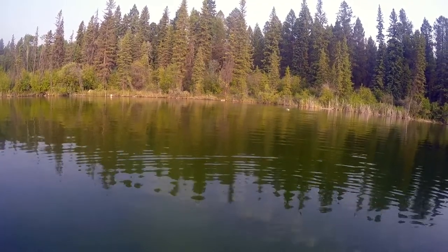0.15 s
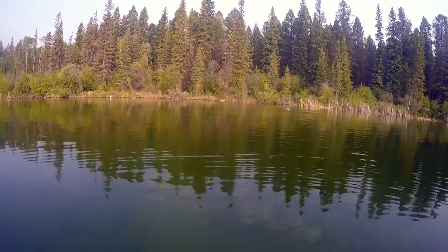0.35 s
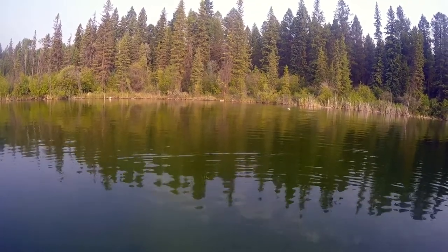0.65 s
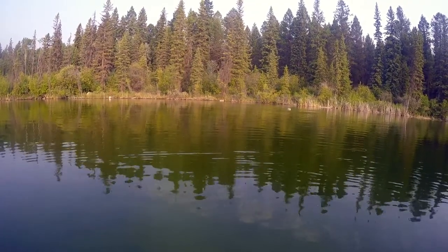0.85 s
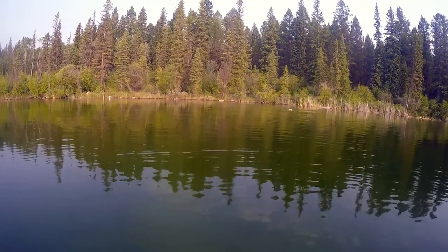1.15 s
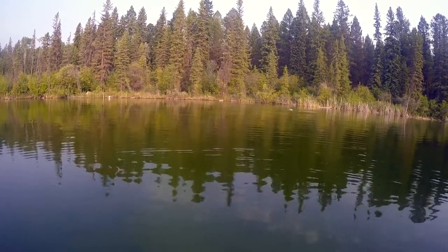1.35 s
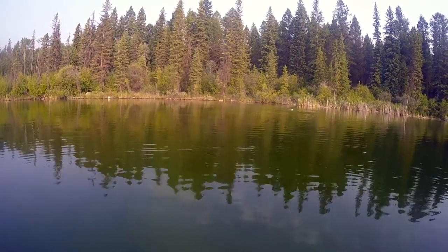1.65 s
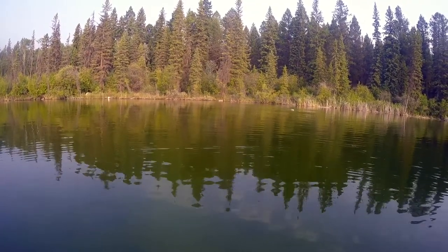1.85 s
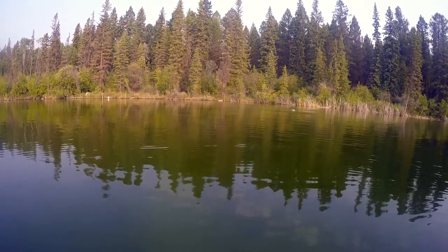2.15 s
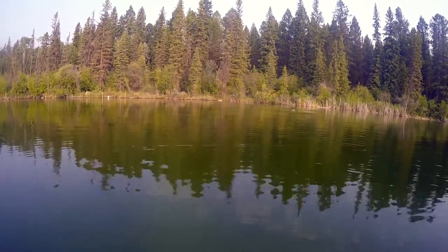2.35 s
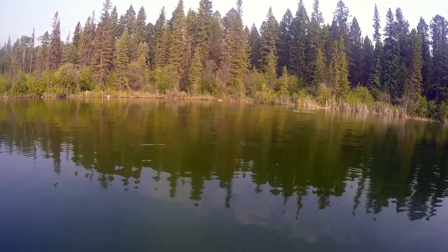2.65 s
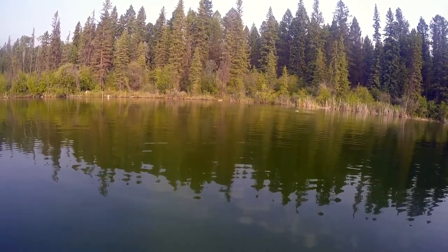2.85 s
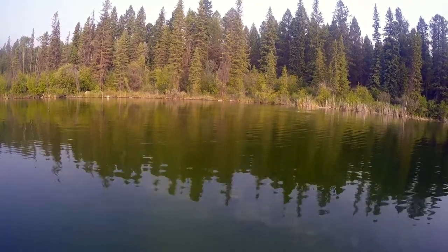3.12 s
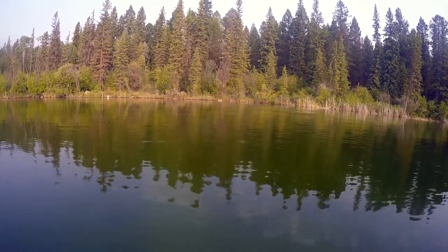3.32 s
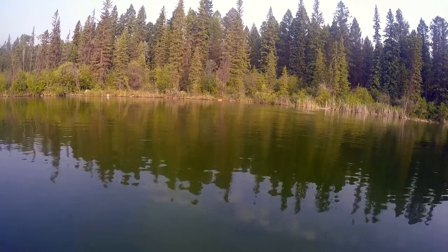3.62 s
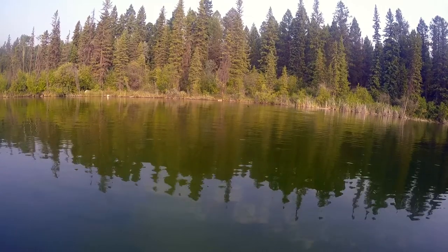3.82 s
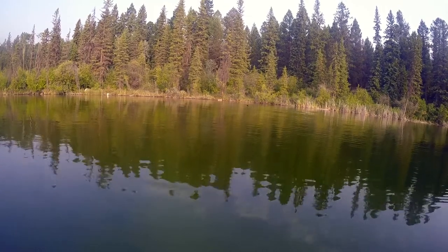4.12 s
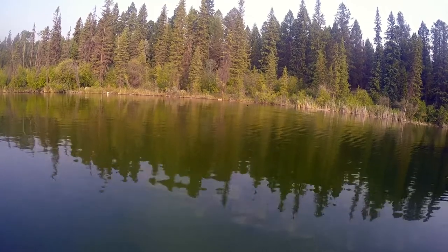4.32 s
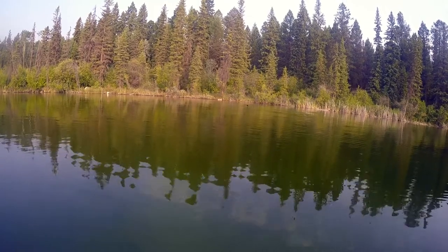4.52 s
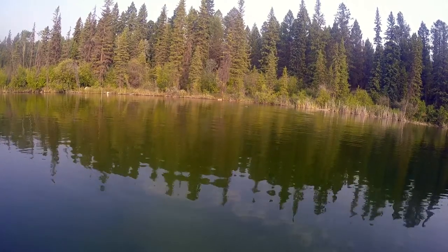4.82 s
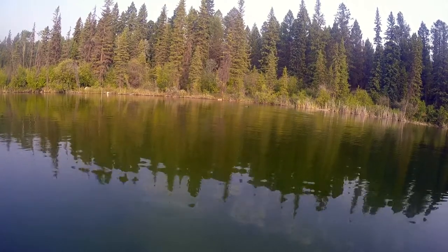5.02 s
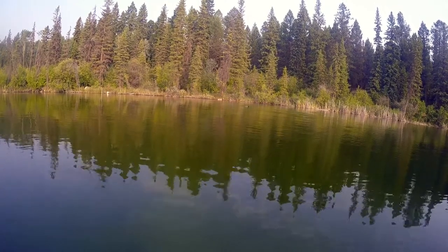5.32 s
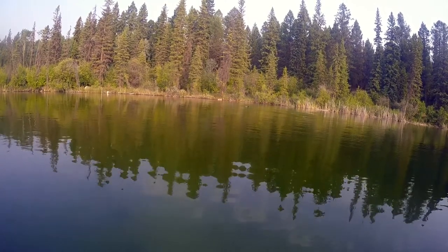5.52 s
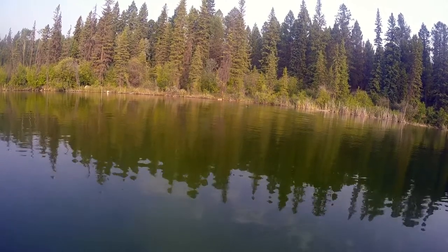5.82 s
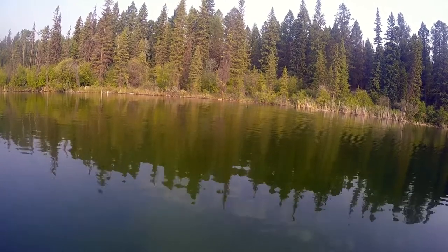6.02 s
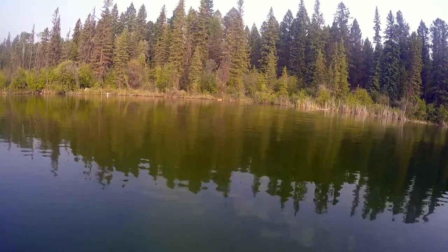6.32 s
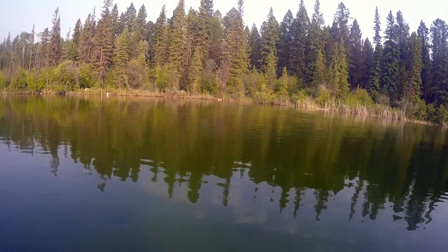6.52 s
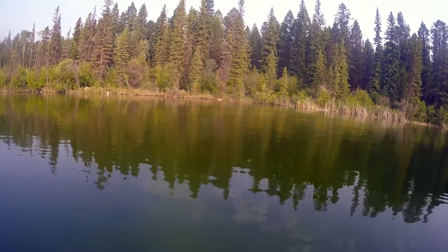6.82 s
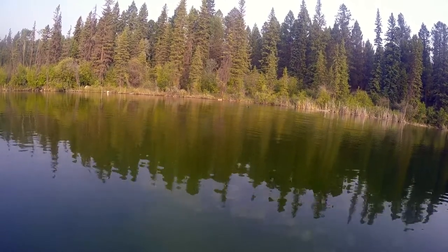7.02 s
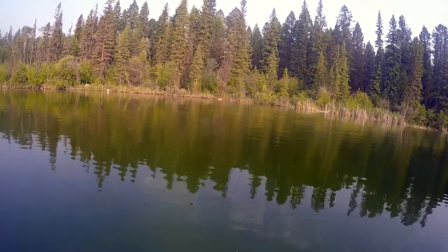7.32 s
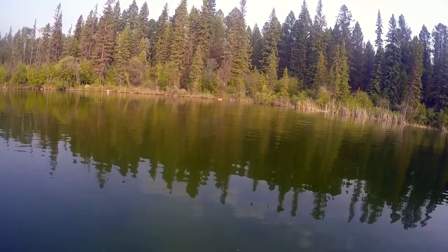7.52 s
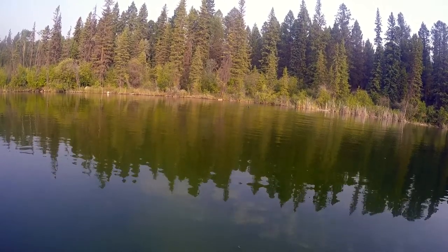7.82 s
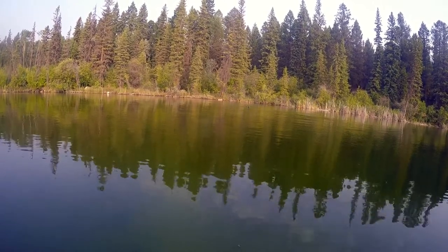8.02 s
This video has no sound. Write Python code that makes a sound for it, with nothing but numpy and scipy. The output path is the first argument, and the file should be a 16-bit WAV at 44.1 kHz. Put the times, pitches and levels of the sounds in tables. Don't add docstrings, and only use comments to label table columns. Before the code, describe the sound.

Two loons trade quavering, laughing tremolo calls across an echoing forest lake while small wavelets plop and tap against a hollow boat hull.

```python
import sys
import numpy as np
from scipy import signal
from scipy.io import wavfile
from scipy.ndimage import uniform_filter1d

SR = 44100
rng = np.random.default_rng(int(sys.argv[2]) if len(sys.argv) > 2 else 0)


def boost(x):
    u = np.asarray(x, float) / 20
    return 10 ** u


def dump_mix(stems):
    frames = np.atleast_2d(stems).T
    limited = np.clip(frames, -1, 1)
    pcm = np.round(limited * 32767).astype(np.int16)
    wavfile.write(sys.argv[1], SR, pcm)


N = 359856


def evened(x):
    return x / np.sqrt(np.mean(x ** 2) + 1e-20)


def add(mix, start_s, sound):
    part = mix[round(start_s * SR):][:len(sound)]
    part += sound[:len(part)]


def wander(count, span):
    noise = uniform_filter1d(rng.standard_normal(count), span)
    return evened(uniform_filter1d(noise, span))


# frequency_hz, density_db (dB per Hz)
AIR_SPECTRUM = [(12, -42), (20, 6.5), (106, -12), (190, -14), (243, -16), (424, -20), (718, -18),
                (922, -21.5), (1150, -21), (1360, -24.5), (1700, -24), (5020, -28), (5450, -30),
                (8740, -35), (15200, -39)]


def air():
    frames, hz = N // 512 + 5, np.fft.rfftfreq(2048, 1 / SR)
    real, imaginary, patches = rng.standard_normal((frames, 1025, 3)).T
    patches = evened(uniform_filter1d(uniform_filter1d(patches, 14, 0), 8, 1))
    curve_hz, curve_db = np.transpose(AIR_SPECTRUM)
    density_db = np.interp(np.log(hz + 1), np.log(curve_hz + 1), curve_db)
    spectra = (real + 1j * imaginary) * boost(density_db[:, None] + .7 * patches)
    noise = signal.istft(spectra, nperseg=2048, noverlap=1536)[1][:N]
    return boost(-58) * evened(noise)


def camera_ticks(hz=8550, db=-73, width_s=0.0016, first_s=0.056):
    t = np.arange(N) / SR
    frame_s = 1001 / 30000
    since = (t - first_s) % frame_s - frame_s / 2
    return boost(db) * np.exp(-.5 * (since / width_s) ** 2) * np.sin(2 * np.pi * hz * since)


# centre_s, level_db, length_s
HULL_BOOMS = [(0.301, -72.5, 0.54), (1.95, -65.5, 0.21), (2.865, -60, 0.13), (3.296, -57, 0.19),
              (4.049, -69, 0.26), (4.95, -65.5, 0.27), (5.388, -60, 0.156), (5.808, -68.5, .25),
              (7.331, -59.5, 0.25), (7.728, -55.5, .2)]


def hull_hum(low_hz=88, high_hz=110, rest_db=-69):
    t = np.arange(N) / SR
    lift = boost(rest_db)
    for s, db, length in HULL_BOOMS:
        lift = lift + boost(db) * np.exp(-(2 * (t - s) / length) ** 4)
    band = signal.butter(2, [low_hz, high_hz], "band", fs=SR, output="sos")
    return lift * evened(signal.sosfilt(band, rng.standard_normal(N)))


# start_s, peak_db
LAP_TICKS = [(0.1271, -56), (0.1531, -57), (0.1705, -57), (0.188, -54), (0.2089, -53), (0.3491, -53),
             (0.5277, -54), (1.2854, -52), (1.3374, -49), (1.696, -52), (2.3455, -54), (3.5164, -51),
             (4.228, -53), (4.2497, -46), (4.385, -53), (5.1203, -55), (5.3787, -53), (5.4969, -50),
             (5.5897, -54), (5.6695, -51), (5.8147, -52), (5.9154, -54), (6.5994, -60), (7.1492, -49),
             (7.2833, -48), (7.8885, -48), (8.088, -51)]


def lap_ticks(per_s=9, db=-63, spread_db=3.5, low_hz=1300, high_hz=5600):
    sizes = boost(db + spread_db * np.minimum(rng.exponential(1, N), 3))
    hits = (rng.random(N) < per_s / SR) * sizes
    fade = np.exp(-np.arange(200) / 70.)
    out = np.zeros(N)
    for s, peak_db in LAP_TICKS:
        add(out, s, boost(peak_db + 3) * fade * rng.standard_normal(200))
    faint = signal.oaconvolve(hits, fade * rng.standard_normal(200))[:N]
    band = signal.butter(3, [low_hz, high_hz], "band", fs=SR, output="sos")
    return signal.sosfilt(band, out + faint)


# frequency_hz, level_db, t60_s
HULL_MODES = [(601, 2.5, 0.016), (900, 9.5, 0.011), (1303, 8, 0.011), (1600, 2, .01), (1950, 5, 0.018),
              (2740, -1, 0.01), (4200, -9, 0.01), (5800, -24, 0.021)]


def slap(mix):
    t = np.arange(1000) / SR
    rings = 0
    for (hz, db, t60), (share, detune) in zip(HULL_MODES, mix):
        decay = boost(db + 2.5 * share - 60 * t / t60)
        rings = rings + decay * np.sin(2 * np.pi * hz * (1 + .07 * detune) * t + 3 * share)
    return (1 - np.exp(-t / .0008)) ** 2 * rings


def plop(db, hz, t60, slap_db):
    t = np.arange(round(1.5 * t60 * SR)) / SR
    wobble = np.clip((-28 - db) / 30, .05, .6)
    pitch = hz * (1.005 - 0.04 * np.exp(-t / 0.0016) + .07 * wobble * wander(len(t), 30))
    swell = (1 - np.exp(-t / 0.0036)) ** 1.3 * boost(-60 * (t / (.8 * t60)) ** 1.4)
    strength = swell / swell.max() * (1 + .6 * wobble * wander(len(t), 24))
    sound = boost(slap_db + .4 * wobble) * slap(rng.standard_normal((len(HULL_MODES), 2)))
    sound = np.r_[sound, np.zeros(len(t))]
    add(sound, 0, strength * np.sin(2 * np.pi * np.cumsum(pitch) / SR))
    return boost(db) * sound


# start_s, length_s, level_db
DRAININGS = [
    (6.02, .14, -57),
    (7.3, .12, -60),
    (7.62, .11, -52),
    (7.75, .13, -55),
    (8.0, .12, -58),
]


def gurgles(count=14, low_hz=520, octaves=1.5, spread_db=3.0):
    out = np.zeros(N)
    for s, length, db in DRAININGS:
        for when, size, softness in rng.random((count, 3)):
            bubble = plop(db - 2 * spread_db * softness, low_hz * 2 ** (octaves * size), .03, -14)
            add(out, s + when * length, bubble)
    return out


def scatter(x, start_s, swell_s, t60, cut_hz):
    t = np.arange(round(1.1 * t60 * SR)) / SR
    tail = rng.standard_normal(len(t)) * (1 - np.exp(-t / swell_s)) * boost(-60 * t / t60)
    tail = signal.lfilter(*signal.butter(2, cut_hz, fs=SR), tail)
    tail = np.r_[np.zeros(round(start_s * SR)), tail / np.linalg.norm(tail)]
    return signal.fftconvolve(x, tail)[:N]


# start_s, peak_db, bubble_hz, t60_s, slap_db (beside the bubble)
STRONG_PLOPS = [(0.052, -39, 2820, 0.0089, -11), (0.076, -39, 1910, 0.025, -30),
                (0.371, -31.5, 1297, 0.034, -21), (1.061, -36, 2117, 0.014, -11),
                (1.776, -36.5, 1674, 0.017, -8), (2.021, -24, 1138, 0.029, -27),
                (2.111, -40, 1950, 0.022, -8.5), (2.478, -40, 2010, 0.012, -4),
                (2.957, -41.5, 1645, 0.024, -10), (3.658, -34, 1970, 0.023, -15),
                (3.791, -28, 1902, 0.026, -17.5), (3.933, -33, 2024, 0.016, -8.5),
                (4.025, -39.5, 1295, 0.024, -33), (4.083, -41, 1756, 0.033, -6),
                (4.433, -31, 1986, 0.018, -12), (4.763, -41, 2085, 0.017, -6), (5.711, -47, 1080, .03, -30),
                (5.967, -34, 824, 0.046, -20), (6.192, -36, 1121, 0.04, -15),
                (6.537, -26.5, 1303, 0.012, -22.5), (6.781, -37, 1329, 0.045, -10),
                (7.224, -24.5, 1940, 0.024, -18), (7.522, -30.5, 1940, 0.018, -11),
                (7.668, -39.5, 2950, 0.012, -4.5), (7.78, -31.5, 1920, 0.021, -12)]
# bubble_hz, t60_s, slap_db
AIR_POCKETS = [
    (1307, 0.02, -3.5),
    (1618, 0.016, -6.5),
    (1970, 0.017, -6.5),
    (2900, .012, -5),
]
# start_s, peak_db
LAPS_WIDE = [(0.489, -55), (5.888, -52), (6.323, -51.5), (6.395, -48.5), (6.499, -54), (6.832, -51),
             (6.86, -51), (7.148, -49), (8.026, -58)]
LAPS_MIDDLE = [(0.349, -53), (0.995, -45), (2.396, -50), (2.627, -42.5), (4.684, -47), (5.081, -53),
               (5.513, -49.5), (5.73, -48.5), (6.466, -47.5), (8.041, -51.5)]
LAPS_NARROW = [(0.861, -46), (1.265, -41.5), (1.396, -44), (2.243, -51), (4.971, -50), (5.379, -51.5),
               (5.442, -50.5), (5.915, -51), (7.056, -47), (7.101, -50), (7.178, -53), (7.268, -54),
               (7.283, -45.5), (7.862, -50), (7.89, -46), (8.13, -47)]
LAPS_TIGHT = [
    (3.227, -56),
    (3.372, -52),
    (5.226, -52.5),
]
# start_s, peak_db, bubble_hz
LOW_GULPS = [(0.153, -44.5, 765), (1.116, -46, 1155), (2.022, -43, 540), (4.272, -49, 520),
             (5.496, -48.5, 1093), (5.59, -52, 630), (5.669, -56, 720), (5.804, -50, 593),
             (6.133, -51.5, 833), (6.172, -48.5, 760), (7.621, -61, 980), (7.638, -52, 770),
             (8.075, -52.5, 790)]
BRIGHT_BUBBLES = [(3.677, -47, 3950), (4.084, -49, 3600), (6.325, -56.5, 3960), (6.396, -54, 4200),
                  (6.86, -50.5, 4200), (6.891, -55, 4840), (7.283, -56.5, 6500), (7.889, -53.5, 4600),
                  (8.116, -49.5, 3930)]
EARLY_DRIPS = [(.085, -54, 4000), (.188, -55, 4600), (.298, -56, 2500), (.657, -57, 3000),
               (.753, -48, 2950), (.843, -53, 2100), (.886, -54, 2500), (.94, -55, 2250),
               (1.108, -46, 2560), (1.179, -49, 1200), (1.42, -50, 2600), (2.695, -47, 2550),
               (2.715, -48, 2520), (3.63, -44, 2700), (4.193, -53, 2850), (4.306, -54, 2700),
               (4.385, -53, 3900), (4.386, -50, 1900), (1.239, -48, 1970), (1.275, -50, 2900),
               (1.285, -51, 2000), (1.323, -51, 1950), (1.341, -48, 1720), (1.464, -54, 2400),
               (1.566, -54, 2400), (1.573, -53, 1900), (1.664, -54, 2400), (1.733, -55, 4400),
               (1.884, -53, 2700), (1.965, -38, 1300), (2.065, -52, 2450), (2.244, -52, 2800),
               (2.294, -52, 1950), (2.3, -54, 2700), (2.478, -50, 3900), (2.579, -56, 1700),
               (2.643, -50, 2700), (2.654, -50, 2050), (2.707, -52, 2000), (2.749, -52, 2750),
               (2.984, -55, 3900), (3.024, -54, 2500), (3.036, -53, 1800), (3.311, -43, 900),
               (3.517, -50, 2000), (3.552, -52, 1900), (3.565, -50, 1900), (3.604, -54, 1900),
               (3.705, -53, 2800), (3.714, -52, 1950), (4.686, -46, 1900), (4.764, -50, 3000),
               (4.973, -50, 4000), (5.12, -57, 2800), (5.146, -55, 2800)]
LATER_DRIPS = [(4.944, -55, 2000), (5.324, -58, 2950), (5.39, -55, 1900), (5.459, -57, 1500),
               (5.497, -53, 2000), (5.59, -55, 2000), (5.67, -54, 4500), (5.671, -56, 2000),
               (5.756, -57, 2100), (5.816, -57, 3700), (5.911, -56, 2700), (5.982, -54, 2050),
               (6.224, -54, 1800), (6.301, -54, 1950), (6.391, -54, 1750), (6.5, -54, 2850),
               (6.538, -54, 2650), (6.63, -56, 1950)]
BOW_RUN = [(6.424, -43, 2900), (6.425, -45, 1980), (6.445, -45.5, 2850), (6.445, -52, 1900),
           (6.474, -45, 3080), (6.476, -51, 1950), (6.575, -60, 2050), (6.625, -56, 2000),
           (6.651, -59, 2900), (6.765, -56, 1750), (6.783, -50, 2050), (6.804, -61, 4800),
           (6.86, -52, 1950), (6.893, -49, 2600), (6.918, -46, 2850), (6.94, -55, 2100), (6.94, -56, 1300),
           (7.149, -54, 2000), (7.318, -53, 2050), (7.34, -60, 3600), (7.347, -52, 2000),
           (7.416, -56, 2800), (7.734, -54, 1950), (7.788, -44, 2720), (7.788, -42, 1750),
           (7.842, -54, 1350), (7.888, -51, 1150)]
# frequency_hz, level_db, t60_s
BOAT_CAVITY = [(1308, -49, 0.052), (1848, -50, 0.079), (801, -53, 0.13)]


def lapping(per_s=100, small_db=-71, spread_db=4.5):
    out = np.zeros(N)
    for s, *drop in STRONG_PLOPS:
        add(out, s, plop(*drop))
    for laps, (hz, *ring) in zip((LAPS_WIDE, LAPS_MIDDLE, LAPS_NARROW, LAPS_TIGHT), AIR_POCKETS):
        for s, db in laps:
            add(out, s, plop(db, hz * rng.uniform(.98, 1.02), *ring))
    # events, t60_s, slap_db
    for rows, t60, slap_db in ((LOW_GULPS, .023, -4), (BRIGHT_BUBBLES, .009, -6.5), (EARLY_DRIPS, .012, -9),
                               (LATER_DRIPS, .012, -9), (BOW_RUN, .012, -6)):
        for s, db, hz in rows:
            add(out, s, plop(db, hz, t60, slap_db))
    busy = boost(5 * wander(N, 4000))
    for _ in range(8):
        sizes = boost(small_db + spread_db * np.minimum(rng.exponential(1, N), 3))
        hits = sizes * (rng.random(N) < busy * per_s / 8 / SR)
        out += signal.oaconvolve(hits, slap(rng.standard_normal((len(HULL_MODES), 2))))[:N]
    t = np.arange(6000) / SR
    cavity = sum(boost(db - 60 * t / t60) * np.sin(2 * np.pi * hz * t) for hz, db, t60 in BOAT_CAVITY)
    splash = boost(-24.5) * scatter(out, start_s=.006, swell_s=.002, t60=0.056, cut_hz=4600)
    water = out + signal.oaconvolve(out, cavity)[:N] + splash
    return signal.sosfilt(signal.butter(3, 430, "high", fs=SR, output="sos"), water)


def arched(t, s, values, bend):
    if bend is None:
        return np.interp(t, s, values)
    low_rise, low_fall, top_rise, top_fall = (*bend, 2.05, 2.6)[:4]
    k = np.clip(np.searchsorted(s, t) - 1, 0, len(s) - 2)
    a, b = values[k], values[k + 1]
    u = np.clip((t - s[k]) / (s[k + 1] - s[k]), 0, 1)
    rising = b > a
    from_low = np.where(rising, u, 1 - u)
    arch = 1 - (1 - from_low) ** np.where(rising, top_rise, top_fall)
    return np.minimum(a, b) + abs(b - a) * arch ** np.where(rising, low_rise, low_fall)


def phrase(points, onset, voices, bend, level_bend, top_hz, flutter, flutter_s=.3, strain=0,
           throat=(1, 1, 0), crack=0, muffled_db=-2.3, odd_db=0):
    s, turn_hz, turn_db = np.transpose(points)
    t = np.arange(onset, s[-1], 1 / SR)
    since = t - onset
    arch_hz = arched(t, s, turn_hz, bend)
    hz = arch_hz * (1 + .002 * wander(len(t), 90))
    level = arched(t, s, boost(turn_db), level_bend) * boost(0.56 * wander(len(t), 120))
    climb_rate = np.gradient(arch_hz) * SR
    climbing = np.clip(climb_rate / 4000, 0, 1) * np.exp(-since / flutter_s)
    shiver = np.sin(2 * np.pi * np.cumsum(235 * (1 + 0.058 * wander(len(t), 150))) / SR)
    turns = 2 * np.pi * np.cumsum(hz) / SR + flutter * climbing * shiver
    turns += crack * np.exp(-(since / .014) ** 2) * wander(len(t), 50)
    throat_hz, width_hz, throat_db = throat
    throat_db = throat_db * uniform_filter1d(np.clip(.4 + climb_rate / 1500, 0, 1), 200)
    octaves = np.log2(arch_hz / top_hz)
    uneven_db = [2.0 * (k > 1) * wander(len(t), 1500) for k in range(8)]
    strain_db = strain * np.clip(turn_db.max() + 36, -1.5, 1)
    soft_db = .1 * (20 * np.log10(level) - turn_db.max() + 2)
    opening = np.exp(-since / .06)

    def register(overtones, pinch):
        tone = 0
        for k, db, slope in overtones:
            k = round(k)
            gain_db = db + slope * octaves + strain_db * (k - 1) + soft_db * (k > 2) + uneven_db[k]
            gain_db = gain_db + muffled_db * opening * max(k - 2, 0)
            gain_db = gain_db + odd_db * opening * ((k == 3) - .3 * (k == 4))
            gain_db = gain_db + pinch * throat_db * np.exp(-((k * hz - throat_hz) / width_hz) ** 2)
            tone = tone + boost(gain_db) * np.sin(k * turns + k)
        return tone

    low, high = register(voices[0], 2), register(voices[1], 1)
    flipped = uniform_filter1d(1. * np.maximum.accumulate(arch_hz > 1165), 200)
    tone = low + flipped * (high - low)
    edges = np.clip(np.minimum(since / .008, (s[-1] - t) / .006), 0, 1)
    return onset, np.sqrt(2) * level * tone * edges


def laughs(throbs, sag):
    climb_s, ratio, dip_db, last_s, last_db, rise_s = sag
    rows = np.array(throbs)
    for breath in np.split(rows, np.flatnonzero(rows[:, 3] > 1e-3)[1:]):
        s, hz, db, lead = breath.T
        low_hz, low_db = hz[0] * ratio, db[0] + dip_db
        points = [(s[0] - max(lead[0], rise_s) - 1e-3, low_hz, low_db - 1), (s[0] - rise_s, low_hz, low_db)]
        falls = np.r_[np.diff(s) - climb_s, last_s]
        dips_db = np.r_[dip_db * np.minimum(np.diff(s) / .095, 1) ** 2, last_db]
        sag_hz = ratio * np.r_[np.maximum(hz[1:], hz[:-1]), 1.005 * hz[-1]]
        for row in zip(s, hz, db, s + falls, sag_hz, db + dips_db):
            points += [row[:3], row[3:]]
        end_s, end_hz, end_db = points[-1]
        points += [(end_s + .013, end_hz, end_db - 9)]
        yield points, s[0] - lead[0]


def glide(s, length, hz, db, swell_db, climb, curl=.5, ceiling_hz=905):
    rise = np.clip((ceiling_hz - hz) / max(climb, 1), 0, 1) if hz < ceiling_hz else 1
    rise = min(rise, length - 1e-3)
    end_db = swell_db * rise / length
    top_hz = hz + climb * rise
    points = [(s, hz, db), (s + rise / 2, hz + curl * climb * rise, db + end_db / 2),
              (s + rise, top_hz, db + end_db), (s + length, top_hz, db + swell_db)]
    return points, s


def wind_up(s, hz, sag, climb, db):
    return [(s, hz, db - 7.5), (s + sag, 860, db - 11.5), (s + sag + climb, 1097, db)], s


# multiple, level_db, slope_db (gained per octave of pitch)
MELLOW_VOICE = [(1, 1, -3), (2, -15, 18), (3, -30, 16), (4, -31.5, 39), (5, -41, 31), (6, -48, 34),
                (7, -51, 27)]
BRIGHT_VOICE = [(1, 0, 0), (2, -28, -21), (3, -17.5, 5), (4, -14, 26), (5, -33, -4), (6, -33, .1),
                (7, -47, 6)]
BRIGHT_LOW_VOICE = [(1, 0, 0), (2, -23, 12), (3, -30, .1), (4, -21, 6), (5, -25, .1), (6, -37, 9)]
SQUEEZED_VOICE = [(1, -5, .1), (2, -7, .1), (3, -24, .1), (4, -27, .1), (5, -24, .1), (6, -29, .1),
                  (7, -28, .1)]
SOFT_VOICE = [(1, -0.5, .1), (2, -33, .1)]
LAST_SQUEEZED_VOICE = [(1, -4, 0), (2, 1, 0), (3, -15, 0), (4, -32, 0)]
CLOSING_NOTE_VOICE = [(1, .1, .1), (2, -36, .1), (3, -29, -8), (4, -25, -4), (5, -38, 8)]
# top_s, top_pitch_hz, top_level_db, lead_s (voice sets in before the top; 0 runs on)
MELLOW_TOPS = [(0.054, 1171, -37.5, 0.022), (0.155, 1161, -36, .02), (0.268, 1135, -39.5, 0.012),
               (1.327, 1162, -35.5, .09), (1.427, 1171, -34.5, 0.00016), (1.527, 1178, -34.5, 0.00072),
               (1.629, 1175, -35, 0.00042), (1.733, 1159, -36.5, 0.021), (2.752, 1174, -35, 0.077),
               (2.852, 1193, -34, 0), (2.953, 1190, -35, 0), (3.056, 1188, -34.5, 0.0004),
               (3.165, 1171, -36.5, 0.023), (3.288, 1040, -41, .002), (4.191, 1173, -35, 0.099),
               (4.293, 1184, -35, 0.00032), (4.397, 1189, -36, 0), (4.503, 1189, -37, .025),
               (4.615, 1146, -36.5, .011)]
BRIGHT_TOPS = [(0.728, 1225, -39.5, .006), (0.809, 1271, -36, 0), (0.912, 1257, -37.5, 0),
               (1.018, 1199, -40.2, 0.00022), (1.984, 1279, -37.5, .009), (2.084, 1286, -38, 0.000062),
               (2.187, 1255, -39.5, 0), (2.297, 1175, -42, 0), (3.294, 1164, -40, .006),
               (3.368, 1282, -35.5, 0), (3.467, 1284, -35.5, 0.000073), (3.572, 1248, -37, 0),
               (3.682, 1183, -40, 0.00024), (4.611, 1292, -37.5, .007), (4.708, 1306, -34.9, 0),
               (4.811, 1286, -35.5, 0), (4.918, 1253, -36.5, 0.00022)]
# climb_s, pitch_ratio, dip_db (from the top), last_fall_s, last_dip_db, first_rise_s
MELLOW_DIP = (0.055, 0.785, -15.5, .046, -13, 0.052)
BRIGHT_DIP = (0.051, 0.8, -18, .064, -15, .05)
# time_s, pitch_hz, level_db
CLOSING_NOTE = [
    (4.984, 790, -58),
    (5.03, 972, -42.5),
    (5.064, 945, -52),
]
# start_s, pitch_hz, sag_s, climb_s, break_level_db
BREAK_WIND_UPS = [
    (0.632, 916, 0.034, .058, -38),
    (1.883, 997, .051, .044, -37.5),
    (4.542, 930, .016, .044, -36.5),
]
# start_s, length_s, pitch_hz, level_db, swell_db
HELD_NOTE = (3.257, .036, 1058, -39, -1)
THROB_LEAD_INS = [(0.008, 0.028, 700, -53.5, 4), (0.112, .027, 680, -54, 5), (0.226, 0.033, 660, -54, 5),
                  (1.69, .024, 670, -60, 11), (3.118, 0.028, 660, -55, 3), (4.457, .025, 690, -49.5, 2),
                  (4.576, 0.026, 668, -50, 2)]
RISING_SQUEEZES = [(1.193, .05, 705, -47, -6), (1.812, 0.047, 620, -55.5, 3), (1.862, .021, 671, -59, 13),
                   (2.628, .05, 739, -48, -6), (3.222, .034, 610, -62, 12), (3.255, .029, 700, -48.5, -4),
                   (4.06, .037, 755, -44.5, -5), (4.492, .035, 655, -51, -2)]
SLOW_SQUEEZES = [
    (0.586, 0.044, 680, -56, 5),
    (3.195, .035, 585, -56.5, -5),
]
SOFT_HOOTS = [(1.085, 0.038, 790, -59, -9), (2.362, .035, 797, -57, -1), (3.875, .024, 780, -51, -3),
              (4.635, .045, 820, -48, -7), (5.084, .032, 820, -73.5, 21), (5.32, .014, 820, -60.5, 12)]
FINAL_SQUEEZE = (5.727, .052, 805, -50, -9, -800)


def loons():
    out = np.zeros(N)
    throat, squeezed_throat = (2860, 220, 8), (1620, 230, 4.5)  # centre_hz, width_hz, gain_db
    for shape in laughs(MELLOW_TOPS, MELLOW_DIP):
        add(out, *phrase(*shape, (MELLOW_VOICE, MELLOW_VOICE), (1.9, 2.5, 2.05, 2.6), (1.8, 1.9, 2.05, 2.6),
                         top_hz=1168, flutter=0.23, flutter_s=0.34))
    for shape in laughs(BRIGHT_TOPS, BRIGHT_DIP):
        add(out, *phrase(*shape, (BRIGHT_LOW_VOICE, BRIGHT_VOICE), (1.45, 1.6, 1.7, 1.7), (3.6, 4.3, 2.6, 1.7),
                         top_hz=1310, flutter=0.5, flutter_s=0.07, strain=.45, throat=throat,
                         crack=.13, muffled_db=-.4, odd_db=-9))
    add(out, *phrase(CLOSING_NOTE, CLOSING_NOTE[0][0], (CLOSING_NOTE_VOICE, CLOSING_NOTE_VOICE),
                     (1.4, 1.1), (1.2, 1.1), top_hz=970, flutter=.05, throat=(2760, 240, 7), muffled_db=0))
    for shape in [glide(*HELD_NOTE, 630), *(wind_up(*row) for row in BREAK_WIND_UPS)]:
        add(out, *phrase(*shape, (BRIGHT_LOW_VOICE, BRIGHT_LOW_VOICE), (1.5, 1.6), (2.2, 3.2),
                         top_hz=1100, flutter=0.3, flutter_s=0.1, throat=throat))
    squeezes = [(glide(*row, 10000, .28, 960), SQUEEZED_VOICE) for row in THROB_LEAD_INS]
    squeezes += [(glide(*row, 6000), SQUEEZED_VOICE) for row in RISING_SQUEEZES]
    squeezes += [(glide(*row, 1500), SQUEEZED_VOICE) for row in SLOW_SQUEEZES]
    squeezes += [(glide(*FINAL_SQUEEZE), LAST_SQUEEZED_VOICE)]
    for shape, voice in squeezes:
        add(out, *phrase(*shape, (voice, voice), None, None, top_hz=780, flutter=0.15,
                         throat=squeezed_throat, muffled_db=0))
    for row in SOFT_HOOTS:
        add(out, *phrase(*glide(*row, 630), (SOFT_VOICE, SOFT_VOICE), (1.2, 1.2), (.8, .8),
                         top_hz=800, flutter=.1))
    return out


def shore_echoes(birds):
    near = scatter(birds, start_s=0.011, swell_s=0.03, t60=0.48, cut_hz=3000)
    thin = signal.lfilter(*signal.butter(3, 1080, "high", fs=SR), birds)
    far = scatter(thin, start_s=.12, swell_s=0.067, t60=2.2, cut_hz=1450)
    return boost(-27.5) * (near + far)


def scene():
    background = air() + camera_ticks() + hull_hum()
    water = lap_ticks() + gurgles() + lapping()
    birds = loons()
    mono = background + water + birds + shore_echoes(birds)
    return np.array([mono, mono])


def top_cut(x):
    return signal.sosfilt(signal.butter(12, 15380, fs=SR, output="sos"), x)


def record(dry):
    mix = signal.oaconvolve(dry, signal.firwin(255, 15300, fs=SR)[None], "same")
    return top_cut(mix)


dry = scene()
out = record(dry)
dump_mix(out)
```